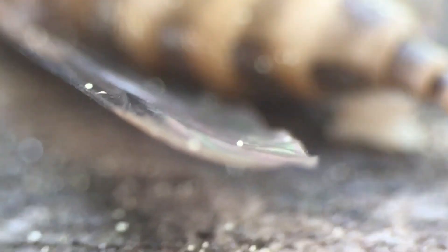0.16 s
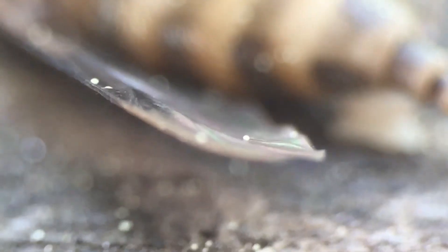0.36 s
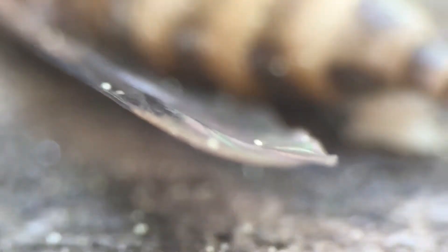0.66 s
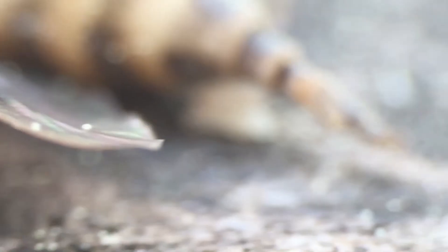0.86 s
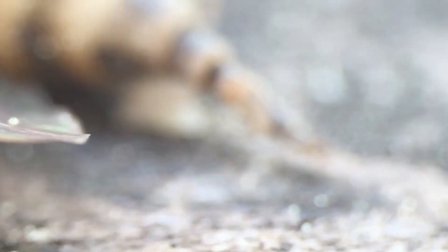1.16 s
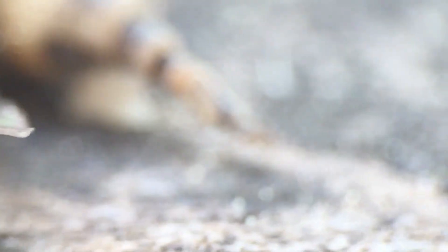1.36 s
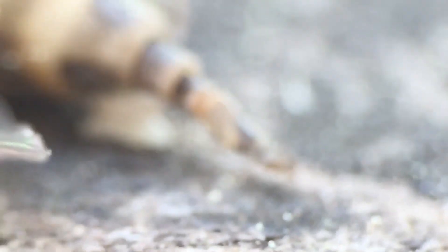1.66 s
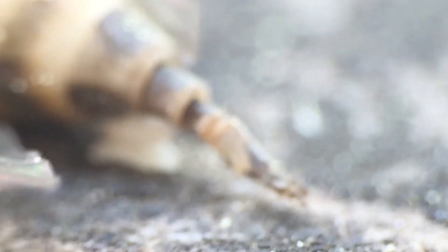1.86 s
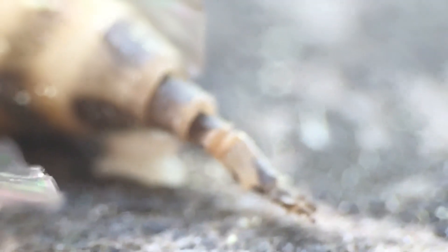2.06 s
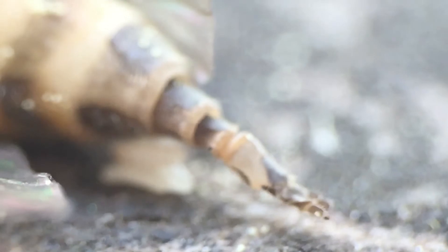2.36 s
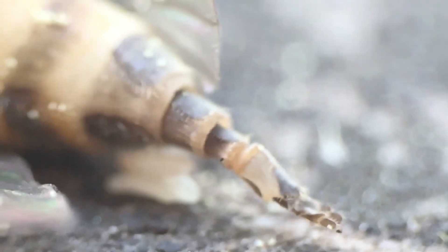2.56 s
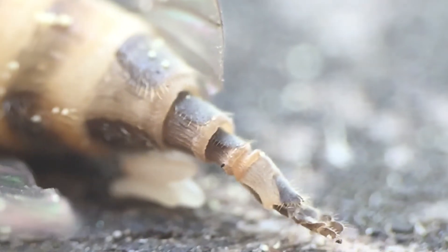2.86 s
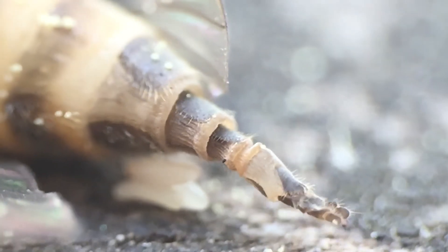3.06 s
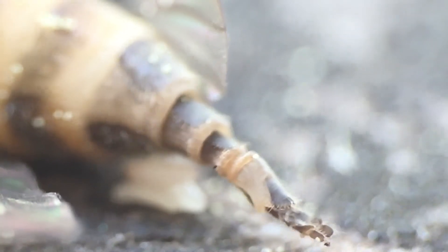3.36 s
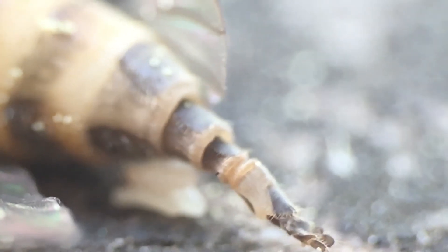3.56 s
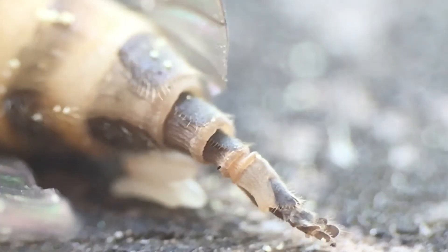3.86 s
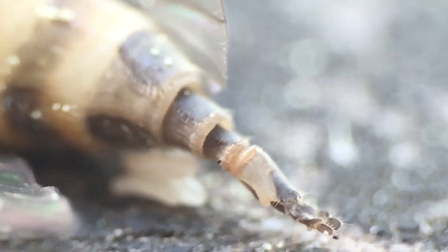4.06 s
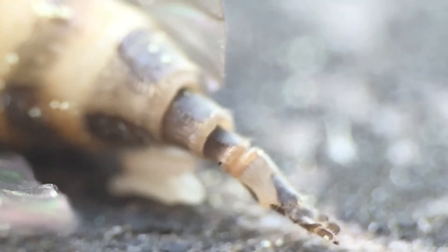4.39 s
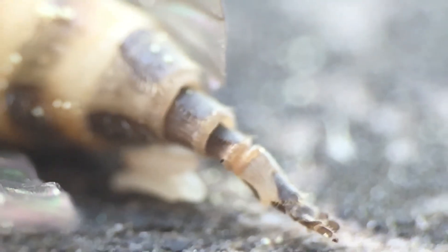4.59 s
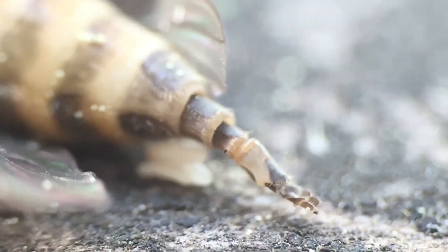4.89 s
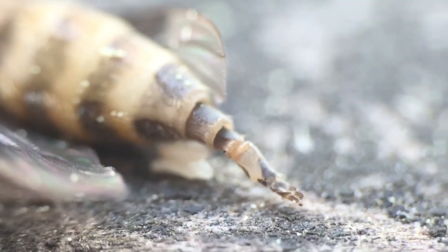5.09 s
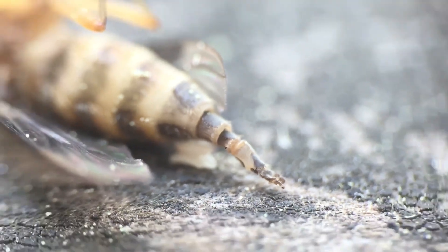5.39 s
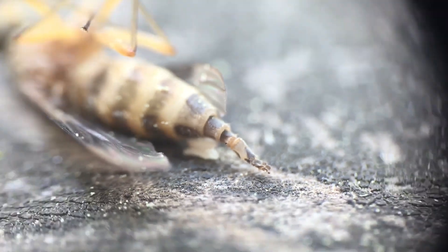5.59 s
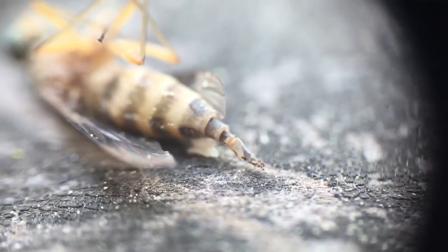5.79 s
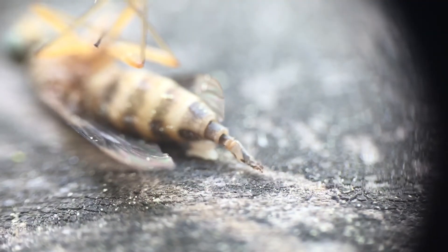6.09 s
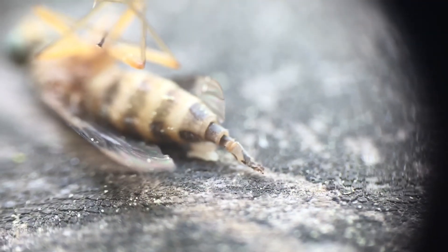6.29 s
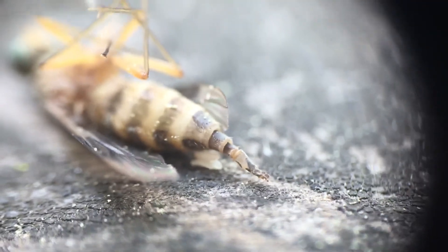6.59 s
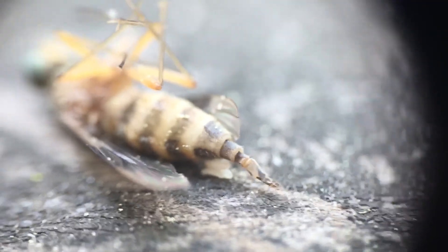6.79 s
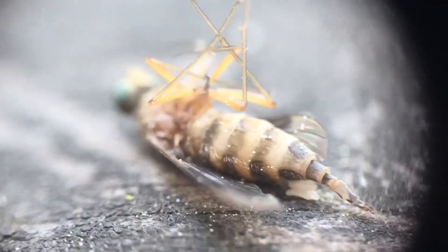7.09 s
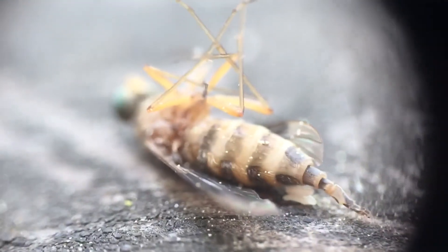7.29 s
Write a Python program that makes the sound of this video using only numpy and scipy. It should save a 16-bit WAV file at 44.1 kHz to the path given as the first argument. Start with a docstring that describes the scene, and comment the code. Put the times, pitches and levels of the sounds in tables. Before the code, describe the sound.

A steady wash of distant road noise and light microphone hiss lies under a deep, throbbing engine far away. A barely audible high whine from a focusing lens comes first. The engine gathers speed, interrupted by two hard plastic clicks right at the microphone, a duller one and then a brighter, stronger one. The hum climbs into a fuller drone, then drops suddenly in pitch, with faint handling ticks and squeaks late on.

```python
"""Distant vehicle pulling away

A far eight-cylinder vehicle gathers speed, then drops its revs, over a wash of distant traffic.
Its engine is a stack of tones on one turning angle; each swells when it meets an exhaust resonance.
Traffic is shaped noise, a broad roar over low rumble, joined by thin hiss and a few faint squeaks.
Close by, a camera's focus motor whines briefly, its body clicks twice and fingers tick on it.
"""
import sys
import numpy as np
from scipy import signal
from scipy.fft import rfft, irfft
from scipy.io import wavfile

SR = 44100
rng = np.random.default_rng(int(sys.argv[2]) if len(sys.argv) > 2 else 0)


def wrap_up_sound(samples):
    """Save the sound to the file named by the first command line argument, as 16-bit audio."""
    columns = np.atleast_2d(samples).T
    # keep every value between -1 and 1, then stretch to whole-number steps
    tamed = np.clip(columns, -1, 1)
    steps = np.round(tamed * 32767).astype(np.int16)
    wavfile.write(sys.argv[1], SR, steps)


N = 328104  # length in samples

# Steady hiss of the microphone itself. Each row: frequency in Hz, level in dB per Hz before scaling.
MIC_HISS_COLOUR = [(2000, 0), (6000, 0), (7400, -3), (9000, -1.5), (10400, -8), (11500, -6.5),
                   (13000, -13.5)]
MIC_HISS_DB = -70

# Loudness of a thin high hiss. Each row: time in seconds, level in dB.
HIGH_HISS_LEVEL = [(0, -96), (3.5, -93), (5, -85), (6.3, -80), (7.44, -84)]
# The band of that hiss. Each row: centre in Hz, width in Hz, level in dB before scaling.
HIGH_HISS_BAND = [(11700, 1700, 0)]

# Roar of far traffic. Each row: time in seconds, level in dB before a fixed lift.
ROAR_LEVEL = [(0.0, -52.5), (4.66, -52), (5.08, -51.5), (5.74, -50), (6.4, -48.5), (6.69, -50.5),
              (7.44, -48.5)]
# Low road rumble. Each row: time in seconds, level in dB.
RUMBLE_LEVEL = [(0, -41), (.7, -37), (1.4, -38), (2.4, -39.5), (3.2, -38.5), (3.9, -37), (4.4, -38.5),
                (4.8, -43.5), (5.6, -32.5), (6.4, -44), (7.44, -36.5)]
# Tone colour of the traffic, then of the rumble. Each row: frequency in Hz, level in dB per Hz before scaling.
TRAFFIC_COLOUR = [(200, 2.5), (300, 4), (520, 0.5), (720, -4), (980, 0), (1250, -3), (1600, -4.5),
                  (2500, -10.5), (3600, -17.5), (4400, -22.5), (5000, -29), (6200, -32), (7400, -40.5),
                  (10400, -42), (11600, -46.5), (13000, -48.5)]
RUMBLE_COLOUR = [(20, -51), (30, -51), (42, 5.5), (55, 10.5), (75, 10), (95, 10), (130, 0.5), (200, -5.5),
                 (400, -63.5)]
ROAR_LIFT_DB = 5.0
# The treble grows faster than the roar: level at the mean roar, and dB gained per dB of roar.
SIZZLE_DB, SIZZLE_FOLLOWS = -45.5, 1.67

# Faint high squeaks. Each row: time in seconds, half-width in seconds, pitch in Hz at that time, level in dB.
SQUEAKS = [(7.178, .004, 8150, -61), (7.179, .005, 6050, -64), (7.212, .013, 5450, -63),
           (7.232, .008, 5400, -66), (7.239, .012, 4550, -61)]
SQUEAK_FALL_HZ_PER_S, SQUEAK_GRAIN_HZ = 6000, 130

# The focus motor creeps, drives, then runs down: times of the two changes, levels, speed of the fade.
FOCUS_HZ = 12390
FOCUS_DRIVE_S, FOCUS_STOP_S = 0.19, 0.66
FOCUS_CREEP_DB, FOCUS_DRIVE_DB, FOCUS_FADE_DB_PER_S = -81, -66.5, 190

# Handling ticks and scuffs. Each row: start in seconds, level in dB, dying time in seconds, centre in Hz.
TICKS = [(3.5177, -53, .001, 15000), (3.567, -55, .003, 15000), (3.922, -61, .025, 10000),
         (6.782, -66, .012, 12000), (6.892, -66, .008, 11000), (6.963, -64, .007, 10000),
         (7.030, -65, .008, 10000), (7.176, -57, .005, 9000), (7.23, -65, .25, 4300)]

# Clicks of the camera body. Each row: time in seconds, level in dB, contact cut-off in Hz,
# thump level in dB, share of the shell's ring time left by the hand.
CLICKS = [(3.5177, -17.5, 3900, -70, .7), (3.7302, -9.2, 9600, -14, 1.0)]
# Ringing of the shell, then of the heavier body. Each row: pitch in Hz, level in dB,
# time to die by 60 dB in seconds (for the shell, before the hand's share).
SHELL_MODES = [(770, -0.5, 0.0056), (1240, -4, 0.0091), (1810, -1, 0.0028), (3570, 0.5, 0.00069),
               (6200, -13.5, 0.0041), (8060, -27, 0.0049), (14000, -8, 0.00083)]
THUMP_MODES = [(185, -2, 0.035), (384, 0.5, 0.012), (89, -10, 0.25)]
# Loose parts after a click: touches per second, level against the snap, dying time.
RATTLE_PER_S, RATTLE_DB, RATTLE_S = 2200, -32, 0.011

# Engine speed. Each row: time in seconds, four-stroke cycles per second.
ENGINE_SPEED = [(0.0, 11.88), (0.6, 11.64), (0.8, 10.68), (1.0, 10.86), (1.3, 11.25), (1.6, 11.89),
                (1.9, 11.64), (2.2, 11.1), (2.5, 11.72), (2.8, 12.44), (3.2, 12.8), (3.55, 13.28),
                (3.8, 12.98), (4.15, 14.04), (4.5, 15.19), (4.75, 16.3), (5.0, 17.17), (5.35, 18.5),
                (5.7, 20.2), (5.95, 21.15), (6.35, 21.94), (6.52, 21.94), (6.7, 19.12), (6.87, 16.26),
                (7.44, 16.17)]

# Strength of the deep hum, shared by all its orders. Each row: time in seconds, level in dB.
HUM_EFFORT = [(0, -8), (.45, -7), (1.1, -1), (1.68, 4.5), (2.4, 0.5), (2.7, -2.5), (3.1, -4), (3.8, -12),
              (4.4, -6), (4.9, 1.5), (5.3, -1.5), (5.7, 6), (6.15, 4.5), (6.65, 4), (7.44, -5)]
# Low engine orders: firing at 8, beats of the uneven banks below. Each row: waves per cycle, level in dB.
HUM_ORDERS = [(3, -4), (4, -20.5), (5, -1), (6, -25), (7, -22.5), (8, 1), (10, -17)]
# How well the exhaust carries a low order. Each row: pitch in Hz, level in dB.
HUM_RESPONSE = [(36, -53), (44, -57), (53, -33), (60, -48), (66, -34), (79, -35.5), (86, -35.5), (94, -29),
                (109, -29), (116, -35.5), (146, -39.5), (160, -51)]
# The hum dips briefly. Each row: time in seconds, depth in dB, half-width in seconds.
HUM_DIPS = [(0.25, 7, 0.42), (1.13, 6, 0.05), (1.5, 5.5, 0.088), (1.87, 8.5, 0.1), (2.211, 8, 0.093),
            (2.58, 11, 0.099), (5.852, 17, 0.031), (6.79, 8, 0.034)]
HUM_FLUTTER_DB = 1.3

# Loudness of the overtones in four exhaust registers. Each row: time in seconds, level in dB.
BOOM_LEVEL = [(0, -62.5), (.9, -55), (1.5, -47), (1.95, -53.5), (2.5, -53.5), (2.75, -56.5), (3.3, -57),
              (4.6, -46), (5.1, -43), (5.9, -42.5), (6.5, -41.5), (7.44, -41)]
DRONE_LEVEL = [(0, -60), (.7, -49), (1.6, -47), (2.25, -56), (3.1, -49.5), (3.8, -55.5), (5.4, -49),
               (6.2, -43), (6.8, -47.5), (7.44, -42)]
HIGH_DRONE_LEVEL = [(0, -69), (1.2, -51.5), (2.6, -65), (3.5, -48), (4.1, -48), (4.75, -39.5), (5.4, -52.5),
                    (6.2, -40), (6.8, -47.5), (7.44, -42)]
GROWL_LEVEL = [(0, -83), (.5, -57), (1.2, -45.5), (1.7, -54.5), (2.3, -66), (3.9, -64), (4.4, -53.5),
               (4.8, -55.5), (5.5, -52), (6.25, -49), (6.7, -51.5), (7.44, -59.5)]
# Exhaust resonances of those registers. Each row: centre in Hz, width in Hz, level in dB.
BOOM_MODES = [(183, 20, -3), (202, 19, -3)]
DRONE_MODES = [(262, 22, -5)]
HIGH_DRONE_MODES = [(294, 21, -5.5)]
GROWL_MODES = [(369.5, 28, -5), (400, 26, -6), (470, 60, -13), (640, 200, -17)]
# The next two sets hold at ROUGH_SPEED and grow with the revs.
# Share by which reflections make the tones fade, then gas noise beside the tones in dB.
BOOM_SCATTER, DRONE_SCATTER, GROWL_SCATTER = .25, .27, .38
BOOM_GAS_DB, DRONE_GAS_DB, GROWL_GAS_DB = -18, -13, -8
ROUGH_SPEED = 16  # cycles per second
# The uneven banks favour some overtones. Each entry: level in dB, one per order from the ninth up.
OVERTONE_DB = [-11, -4, -7, -6.5, 1.5, 4, 2, 4.5, 0, -3.5, 1, 5.5, 5.5, 3.5, 1, 2.5, -4, 2, -1, 1.5, 1, 1.5,
               -4.5, 1, -2, -3.5, -1, -8, -9.5]
FIRST_OVERTONE = 9

# One overtone stands out briefly. Each row: time in seconds, engine order, level in dB.
BOOM_SWELLS = [(1.49, 16, -40), (2.23, 16, -38), (2.73, 16, -43), (2.99, 15, -46), (7.08, 13, -43.5),
               (7.24, 13, -41)]
SWELL_HALF_WIDTH_S = .08
# The exhaust rasps once near top revs. Each row: centre in Hz, width in Hz, level in dB before scaling.
RASP_MODES = [(352, 230, -2), (600, 190, -2)]
RASP_S, RASP_HALF_WIDTH_S, RASP_DB = 6.225, .07, -45

CUTOFF_HZ = 15900  # top of the recorded sound


def from_db(db):
    """Turn decibels into a gain."""
    return 10 ** (np.asarray(db) / 20)


def rms_one(x):
    """Scale a sound to unit power."""
    return x / np.sqrt(np.mean(np.abs(x) ** 2) + 1e-20)


def clock():
    """Time of every sample in seconds."""
    return np.arange(N) / SR


def in_time(rows):
    """Join the points of a time curve with straight lines, sample by sample."""
    s, values = np.transpose(rows)
    return np.interp(clock(), s, values)


def bump(s, half_width):
    """A smooth rise and fall of height 1 around a given time."""
    return np.exp(-((clock() - s) / half_width) ** 2)


def running_phase(hz):
    """Add up a changing pitch into the phase of a tone."""
    return 2 * np.pi * np.cumsum(hz) / SR


def drift(rate):
    """Random wandering of spread 1: noise smoothed twice, with a corner at rate in Hz."""
    step = 40  # made at a low sample rate, then stretched
    r = np.exp(-2 * np.pi * rate * step / SR)
    noise = rng.standard_normal(N // step + 2002)
    slow = signal.lfilter([1], [1, -2 * r, r * r], noise)[2000:]  # skip the filter's start
    return np.interp(np.arange(N) / step, np.arange(len(slow)), rms_one(slow))


def coloured_noise(colour):
    """Steady noise of unit power whose spectrum follows a curve over log frequency."""
    hz, db = np.transpose(colour)
    bins = np.maximum(np.arange(N // 2 + 1) * SR / N, 1)
    gain = from_db(np.interp(np.log(bins), np.log(hz), db))
    return rms_one(irfft(rfft(rng.standard_normal(N)) * gain, N))


def flickering_noise(colour, flicker_db, rate, count):
    """Noise of unit power whose narrow bands flicker in level, in seven interleaved groups."""
    spectrum, out = rfft(coloured_noise(colour)), np.zeros(N)
    group = (np.log(np.arange(1, N // 2 + 2)) * count).astype(int) % 7
    for k in range(7):
        out += irfft(spectrum * (group == k), N) * from_db(flicker_db * drift(rate))
    return rms_one(out)


def resonance_gain(modes, hz):
    """Add up resonance peaks, each falling away on both sides of its centre."""
    return sum(from_db(db) / (1 + (2 * (hz - centre) / width) ** 2) for centre, width, db in modes)


def resonant_noise(modes):
    """White noise of spread 1 heard through resonances."""
    bins = np.arange(N // 2 + 1) * SR / N
    return irfft(rfft(rng.standard_normal(N)) * resonance_gain(modes, bins), N)


def impulse(s, db):
    """One single-sample click at a given time."""
    return from_db(db) * (np.arange(N) == round(s * SR))


def ring(strikes, modes):
    """Strikes set damped modes ringing, neighbours in opposite sense."""
    out = np.zeros(N)
    for k, (hz, db, t60) in enumerate(modes):
        r = from_db(-60 / (t60 * SR))  # loss per sample
        w = 2 * np.pi * hz / SR
        resonator = [1, -2 * r * np.cos(w), r * r]
        out += (-1) ** k * from_db(db) * signal.lfilter([.5, 0, -.5], resonator, strikes + 1e-18)
    return out


def microphone_hiss():
    """The microphone's own noise: random, steady and without pitch."""
    return from_db(MIC_HISS_DB) * coloured_noise(MIC_HISS_COLOUR)


def high_hiss():
    """A thin band of noise that slowly changes in level."""
    return from_db(in_time(HIGH_HISS_LEVEL)) * rms_one(resonant_noise(HIGH_HISS_BAND))


def traffic(split_hz=2200):
    """Far tyres roar, with more treble when louder, above a low rumble."""
    roar_db = in_time(ROAR_LEVEL)
    sizzle_db = SIZZLE_DB + SIZZLE_FOLLOWS * (roar_db - roar_db.mean())
    tyres = flickering_noise(TRAFFIC_COLOUR, flicker_db=2.5, rate=11.9, count=18)
    low_pass = signal.butter(2, split_hz, fs=SR, output="sos")
    roar = signal.sosfiltfilt(low_pass, tyres)
    sizzle = tyres - roar
    rumble = flickering_noise(RUMBLE_COLOUR, flicker_db=1.0, rate=5.4, count=4)
    out = from_db(roar_db + ROAR_LIFT_DB) * roar + from_db(sizzle_db) * sizzle
    return out + from_db(in_time(RUMBLE_LEVEL)) * rumble


def squeaks():
    """A few soft, falling notes, perhaps a far bird; fast random fading makes them grainy."""
    out, t = np.zeros(N), clock()
    for s, half_width, hz, db in SQUEAKS:
        phase = running_phase(hz - SQUEAK_FALL_HZ_PER_S * (t - s))
        note = drift(SQUEAK_GRAIN_HZ) * np.sin(phase) + drift(SQUEAK_GRAIN_HZ) * np.cos(phase)
        out += from_db(db) * bump(s, half_width) * note
    return out


def focus_whine(waver_hz=14, flutter_db=3):
    """The lens motor gives a thin tone whose pitch and level waver at random."""
    t = clock()
    level_db = np.where(t < FOCUS_DRIVE_S, FOCUS_CREEP_DB, FOCUS_DRIVE_DB)
    level_db = level_db - FOCUS_FADE_DB_PER_S * np.maximum(t - FOCUS_STOP_S, 0)
    tone = np.sin(running_phase(FOCUS_HZ + waver_hz * drift(37)))
    return from_db(level_db + flutter_db * drift(38)) * tone


def ticks(grain_db=5, grain_hz=160):
    """Fingers shift on the housing: bright, grainy bursts of noise that die away."""
    out, t = np.zeros(N), clock()
    for s, db, length, hz in TICKS:
        edges = [hz * 0.73, min(hz * 1.3, .45 * SR)]
        band = signal.butter(2, edges, "band", fs=SR, output="sos")
        grains = rng.standard_normal(N) * from_db(grain_db * drift(grain_hz))
        fade = (t >= s) * np.exp(-np.abs(t - s) / length)
        out += from_db(db) * fade * rms_one(signal.sosfilt(band, grains))
    return out


def clicks(thump_lag=0.0023):
    """A snap rings the camera's shell, loose parts rattle, and the heavier body thumps just after."""
    out, t = np.zeros(N), clock()
    for s, db, contact_hz, thump_db, ring_share in CLICKS:
        touches = (rng.random(N) < RATTLE_PER_S / SR) * rng.standard_normal(N)
        fade = (t > s) * np.exp(-np.abs(t - s) / RATTLE_S)
        rattle = from_db(db + RATTLE_DB) * fade * touches
        soften = signal.butter(2, min(contact_hz, .45 * SR), fs=SR, output="sos")
        contact = signal.sosfilt(soften, impulse(s, db) + rattle + 1e-18)
        held_shell = [(hz, mode_db, t60 * ring_share) for hz, mode_db, t60 in SHELL_MODES]
        thump = ring(impulse(s + thump_lag, thump_db), THUMP_MODES)
        out += ring(contact, held_shell) - thump
    return out


def hum(speed, angle):
    """Low orders crest together once per engine cycle, each swelling in the exhaust's resonances."""
    dips_db = sum(depth_db * bump(s, half_width) for s, depth_db, half_width in HUM_DIPS)
    level_db = in_time(HUM_EFFORT) - dips_db
    out = np.zeros(N)
    for order, order_db in HUM_ORDERS:
        pipe_db = np.interp(order * speed, *np.transpose(HUM_RESPONSE))
        flutter_db = HUM_FLUTTER_DB * drift(17.0)
        out += from_db(level_db + order_db + pipe_db + flutter_db) * np.cos(order * angle)
    return np.sqrt(2) * out


def overtones(speed, angle, modes, scatter, gas_db):
    """Higher orders swell as they cross fixed resonances; fading and gas noise grow with the revs."""
    out, rough = np.zeros(N), speed / ROUGH_SPEED
    fading = scatter * rough
    for order, db in enumerate(OVERTONE_DB, FIRST_OVERTONE):
        gain = from_db(db) * resonance_gain(modes, order * speed)
        if gain.max() < .03:  # too faint to matter
            continue
        phase = order * angle + rng.uniform(0, 2 * np.pi)
        # Two random parts make the tone's strength and phase wander.
        out += gain * ((1 + fading * drift(4)) * np.sin(phase) + fading * drift(4) * np.cos(phase))
    gas = np.sqrt(SR / 2 / ROUGH_SPEED) * resonant_noise(modes)
    return out / np.sqrt(.5 + fading ** 2) + from_db(gas_db) * rough * gas


def boom_swells(angle):
    """Single clean engine orders stand out of the boom for a moment."""
    out = np.zeros(N)
    for s, order, db in BOOM_SWELLS:
        out += from_db(db) * bump(s, SWELL_HALF_WIDTH_S) * np.sin(order * angle)
    return np.sqrt(2) * out


def rasp():
    """One short burst of noise through broad exhaust resonances."""
    return from_db(RASP_DB) * bump(RASP_S, RASP_HALF_WIDTH_S) * rms_one(resonant_noise(RASP_MODES))


def engine():
    """One turning angle drives the hum and the exhaust's boom, two drones and growl; a rasp joins in."""
    speed = in_time(ENGINE_SPEED)
    angle = running_phase(speed * (1 + 0.0025 * drift(8.64)))  # slightly uneven turning
    registers = [(BOOM_LEVEL, BOOM_MODES, BOOM_SCATTER, BOOM_GAS_DB),
                 (DRONE_LEVEL, DRONE_MODES, DRONE_SCATTER, DRONE_GAS_DB),
                 (HIGH_DRONE_LEVEL, HIGH_DRONE_MODES, DRONE_SCATTER, DRONE_GAS_DB),
                 (GROWL_LEVEL, GROWL_MODES, GROWL_SCATTER, GROWL_GAS_DB)]
    exhaust = np.zeros(N)
    for level, modes, scatter, gas_db in registers:
        exhaust += from_db(in_time(level)) * overtones(speed, angle, modes, scatter, gas_db)
    return hum(speed, angle) + exhaust + boom_swells(angle) + rasp()


def scene():
    """Add the background, the camera's small sounds and the far vehicle into one channel."""
    background = microphone_hiss() + high_hiss() + traffic() + squeaks()
    camera = focus_whine() + ticks() + clicks()
    return (background + camera + engine())[None]


def record(dry):
    """A steep low-pass filter cuts off the highest treble."""
    low_pass = signal.ellip(10, .1, 80, CUTOFF_HZ, fs=SR, output="sos")
    return signal.sosfilt(low_pass, dry)


dry = scene()
out = record(dry)
wrap_up_sound(out)
```